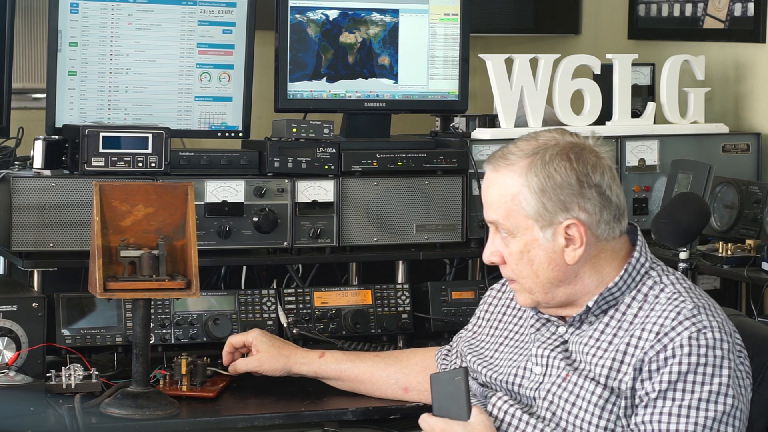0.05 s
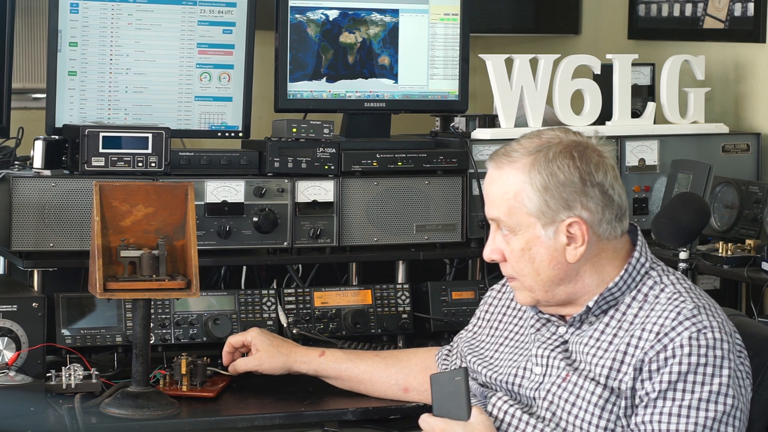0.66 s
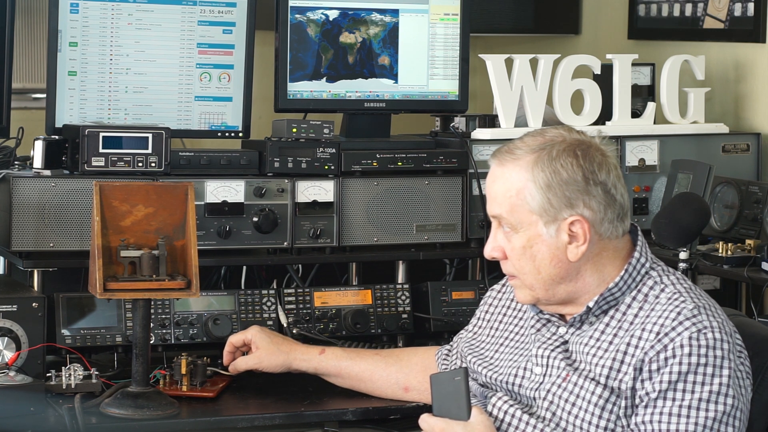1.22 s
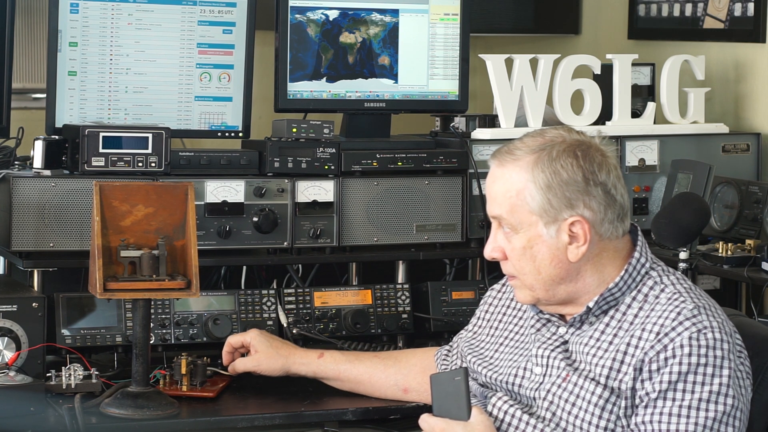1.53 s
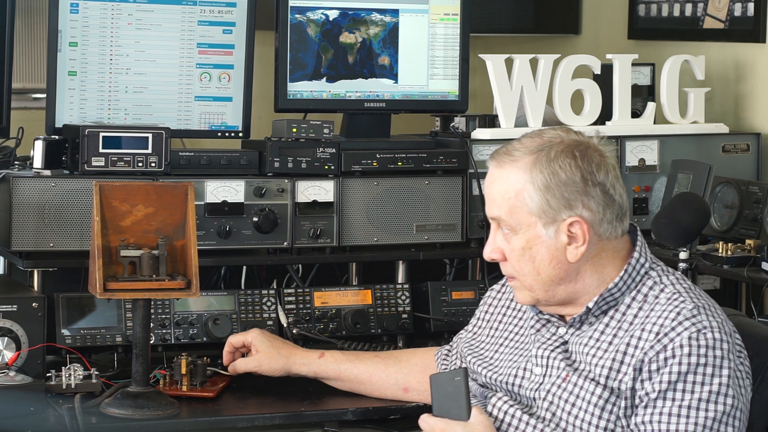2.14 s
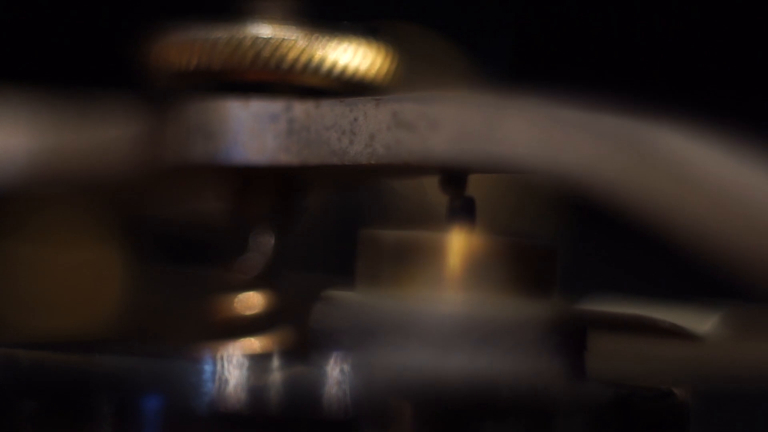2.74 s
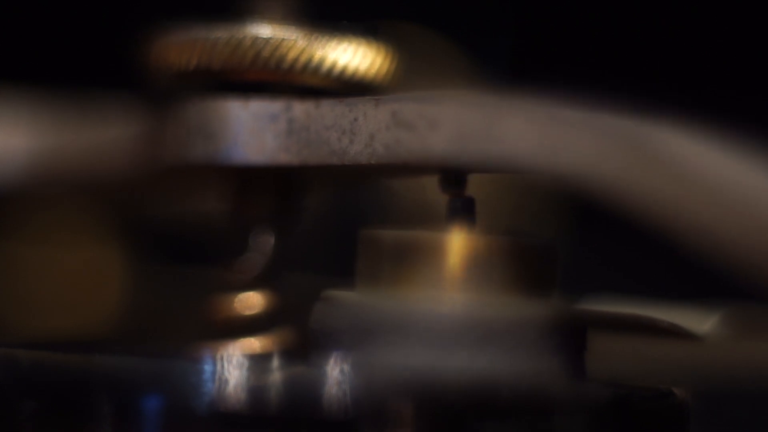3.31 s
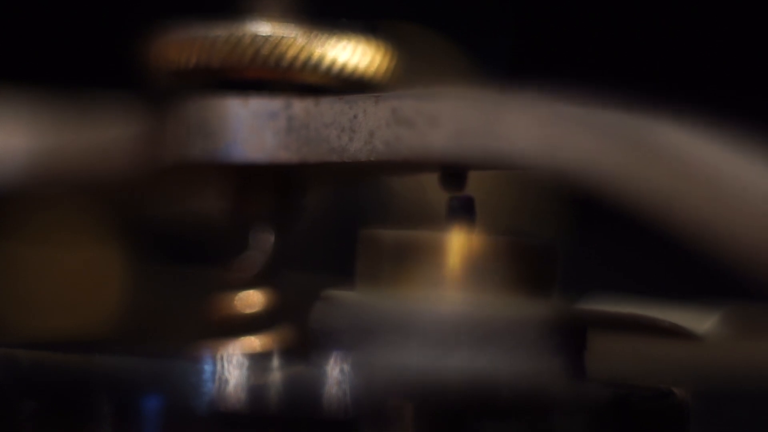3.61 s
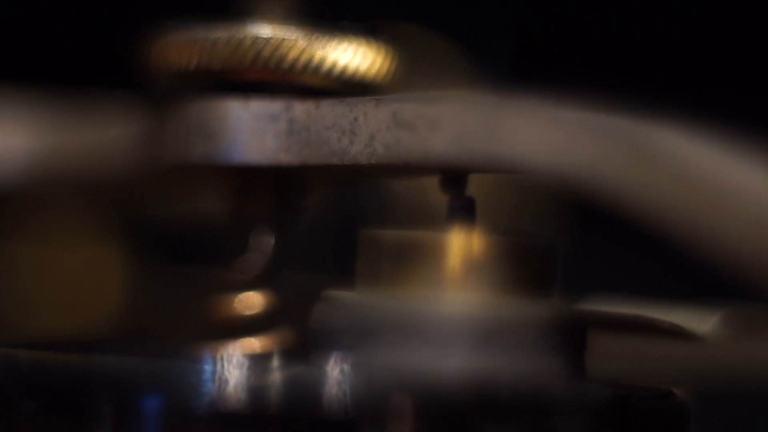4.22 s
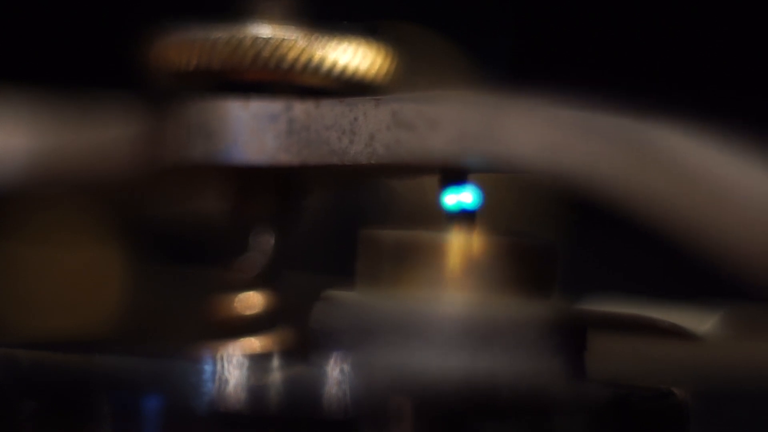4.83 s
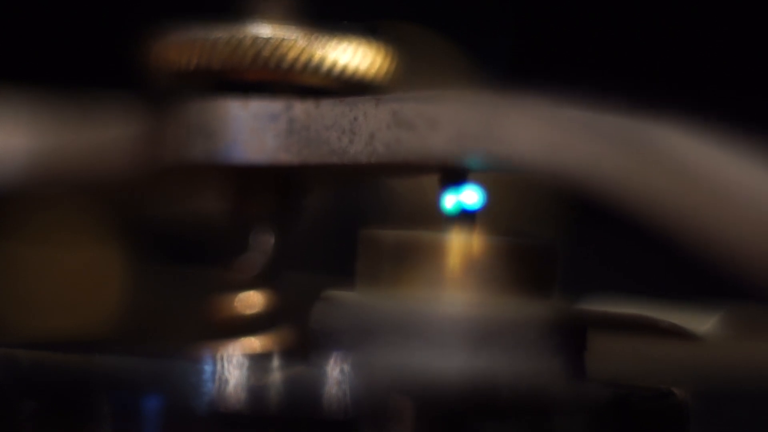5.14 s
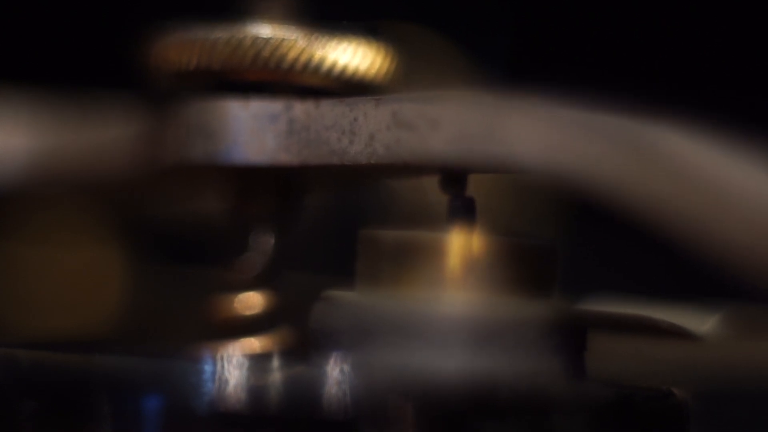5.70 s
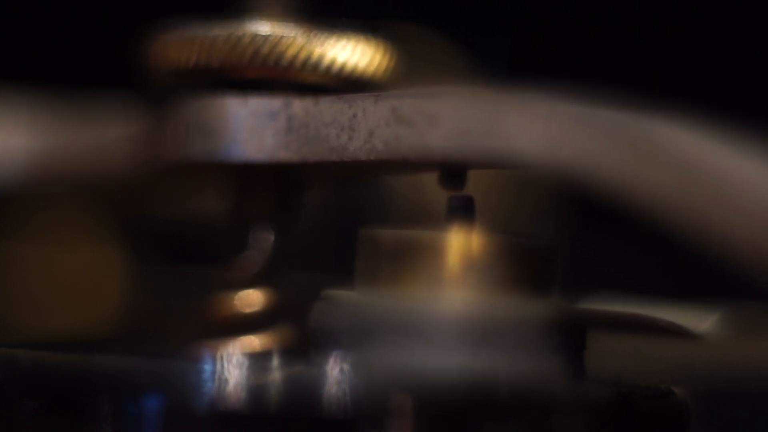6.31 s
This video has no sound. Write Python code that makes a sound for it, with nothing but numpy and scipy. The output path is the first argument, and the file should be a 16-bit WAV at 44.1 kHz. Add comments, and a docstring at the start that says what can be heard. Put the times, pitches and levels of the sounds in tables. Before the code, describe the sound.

A telegraph sounder in a wooden box taps out dots and dashes from the very start until about 6.3 seconds. Each mark is a pair of sounds: a hard, bright metallic click as the lever lands, then a softer, duller clack as it springs back. Both have a brief metal ring and a slightly hollow, small-room tail. The hand key ticks faintly just ahead of each blow.

The rhythm is uneven, about four pairs a second, with dots as tight double clicks and dashes spread about a fifth of a second apart. Long and short pairs mix until around 3 seconds, followed by quick dots to 3.8, three dashes to 4.7, more dots to 5.7, then one dash and two closing dots. A quiet, steady bed of low transformer hum and cooling fans continues underneath throughout.

```python
"""Telegraph sounder in a radio room

A sounder in a wooden resonator box follows a hand key in a small room full of radio gear.
On each dot or dash the magnet pulls the lever onto the anvil with a bright click; the spring
throws it back on the upper stop with a duller clack. The key ticks faintly ahead of each blow.
Underneath lies a steady bed of transformer hum and cooling fans."""
import sys
import numpy as np
from scipy.fft import rfft, irfft, next_fast_len
from scipy.io import wavfile
from scipy.ndimage import map_coordinates

SR = 44100
rng = np.random.default_rng(int(sys.argv[2]) if len(sys.argv) > 2 else 0)


def wav_record(signal):
    """Record a signal, one row per channel, as 16-bit PCM in the file named by sys.argv[1]."""
    frames = np.transpose(np.atleast_2d(signal))
    bounded = np.clip(frames, -1, 1)
    # unit amplitude maps onto the largest positive 16-bit level
    quanta = np.round(bounded * 32767).astype(np.int16)
    wavfile.write(sys.argv[1], SR, quanta)


N = 289384
HIT_SAMPLES = SR // 4
T = np.arange(HIT_SAMPLES) / SR  # time within one hit

# colour of the fans' rush: f/Hz, relative level/dB
FAN_RUSH = [(25, -27), (50, -21), (75, -11.5), (100, -18), (130, -8), (155, -13.5), (240, -2), (330, -3),
            (680, -4), (1000, -8.5), (2400, -14), (5000, -18.5), (10000, -19.5), (11500, -30), (13800, -34)]
# steady tones of transformers and fans: f/Hz, rms level/dB, waver depth
HUM_TONES = [(57.5, -67, .2), (119, -65.5, .4), (172, -47, 0.076), (239.6, -48.5, 0.21), (255.7, -52, 0.36),
             (286, -52, 0.42), (366, -54, 0.62)]
# cabinet resonances: f/Hz, half-width/Hz, rms level/dB
CABINET_MODES = [(232, 16, -55), (304, 12, -55.5), (376, 18, -51.5), (470, 22, -53.5), (619, 33, -49),
                 (800, 33, -50.3)]
# dots and dashes, timed by hand: lever lands t/s, lever lifts t/s
MORSE_MARKS = [(-.23, -.035), (.045, .256), (.536, .742), (.859, .907), (.995, 1.174), (1.274, 1.316),
               (1.525, 1.657), (1.758, 1.966), (2.089, 2.135), (2.225, 2.411), (2.664, 2.836),
               (2.961, 3.001), (3.089, 3.131), (3.369, 3.416), (3.695, 3.753), (3.836, 4.044),
               (4.129, 4.349), (4.540, 4.738), (4.843, 4.909), (5.008, 5.071), (5.171, 5.232),
               (5.328, 5.375), (5.642, 5.707), (5.787, 6.031), (6.122, 6.178), (6.265, 6.311)]
# colour of a hard contact's snap, on key or lever: f/Hz, relative level/dB
CONTACT_SNAP = [(300, -30), (1000, -17), (2000, -10), (3300, -0.5), (5000, -1.5), (6200, -1.5), (9000, -1),
                (11000, -8), (13800, -9)]
# lever on the upper stop, heavily damped modes: f/Hz, relative level/dB, t60/s
STOP_IMPACT_MODES = [(1870, -27, 0.019), (2203, -21, 0.022), (2800, -15.5, 0.015), (3295, -17.5, 0.014),
                     (3780, -16, 0.013), (4300, -13, 0.0089), (4650, -18, .01), (5750, -19.5, 0.0087),
                     (6720, -21, 0.0085), (7370, -13.5, .01), (8660, -10, 0.012), (9120, -14, 0.0093),
                     (9970, -13.5, 0.011), (12040, -16, 0.012), (13040, -16.5, .012)]
# lever on the upper stop, ringing modes: f/Hz, relative level/dB, t60/s
STOP_RING_MODES = [(799, -39.5, 0.22), (1319, -43, 0.22), (1466, -38.5, 0.18), (1958, -33, 0.19),
                   (2085, -34.5, 0.19), (2155, -38, 0.22), (2285, -31, 0.17), (2420, -35, 0.19),
                   (2557, -28, 0.22), (2831, -32.5, 0.26), (2940, -38.5, 0.23), (3440, -32, 0.17),
                   (3550, -32, 0.15), (4188, -42, 0.17), (4260, -33, 0.17), (4400, -30.5, 0.18),
                   (4540, -40, 0.17), (7498, -36, 0.21), (7800, -39, 0.17), (8478, -36.3, 0.15),
                   (8602, -36, 0.17), (12700, -39, 0.17)]
# wash of frame, box and room after a blow on the stop: f/Hz, relative level/dB
STOP_WASH_COLOUR = [(300, -25), (800, -12.5), (1050, -15.5), (1400, -4.5), (1700, -12), (2100, 1.5),
                    (2600, 5.5), (3200, -4.5), (4500, -2), (6300, -9.5), (7700, -2.5), (10000, -4),
                    (11300, -11.5), (13000, -8.5), (13900, -17)]
# lever on the anvil, heavily damped modes: f/Hz, relative level/dB, t60/s
ANVIL_IMPACT_MODES = [(2690, -17, .014), (3123, -13, 0.019), (3393, -2, 0.016), (3880, -5.5, 0.0095),
                      (4140, -5, 0.01), (4597, 1, 0.0083), (4850, -7.5, .007), (5570, -11, 0.0089),
                      (6800, -11.5, 0.0073), (7435, -5, 0.008), (8520, -3.5, 0.0089), (9017, 0, 0.011),
                      (9650, -4.5, 0.011), (10240, -1, 0.0095), (11070, -11, 0.01), (12080, -14, 0.011),
                      (13120, -20, .008)]
# lever on the anvil, ringing modes: f/Hz, relative level/dB, t60/s
ANVIL_RING_MODES = [(801.7, -32, 0.15), (1421, -32.5, 0.16), (1487, -31, .12), (2140, -37, 0.18),
                    (2270, -33, 0.17), (2554, -31.5, 0.19), (2680, -32, 0.17), (2956, -24, 0.2),
                    (3094, -33, 0.16), (3280, -30.5, 0.22), (3336, -26.5, 0.21), (3422, -22, 0.21),
                    (3550, -40, 0.13), (4165, -29, 0.17), (4381, -21.5, 0.17), (4480, -43, 0.13),
                    (4570, -29, .17), (4683, -36, 0.19), (4825, -29.5, 0.23), (8712, -27.5, .18),
                    (8870, -32, 0.19), (8998, -26.5, 0.21), (9110, -28, 0.19), (9230, -26.5, 0.16),
                    (9550, -34, .17), (9628, -34, .17), (9700, -21, .18), (9900, -24, 0.16),
                    (10135, -33, 0.15), (10400, -26, .16)]
# wash of frame, box and room after a blow on the anvil: f/Hz, relative level/dB
ANVIL_WASH_COLOUR = [(300, -34), (800, -14.5), (1100, -22.5), (1450, -12), (1750, -19), (2500, -5),
                     (3200, 1), (3800, -3), (4600, 1.5), (5400, -8.5), (6300, -10), (8000, -6.5),
                     (9100, -1), (10400, -2), (11400, -10.5), (13800, -20)]


def amp(db):
    """Decibels to gain."""
    return 10 ** (np.asarray(db) / 20)


def unit(x):
    """Scale to rms 1."""
    return x / np.sqrt(np.mean(x ** 2) + 1e-20)


def filtered(x, response):
    """EQ a sound; response gives the gain at each frequency."""
    size = next_fast_len(len(x) + 8192)
    gains = response(np.fft.rfftfreq(size, 1 / SR))
    return irfft(rfft(x, size) * gains, size)[:len(x)]


def noise(colour, size):
    """Noise of rms 1, shaped by an EQ curve drawn on a log frequency axis."""
    hz, db = np.transpose(colour)
    white = rng.standard_normal(size)
    return unit(filtered(white, lambda f: amp(np.interp(np.log(f + 1), np.log(hz + 1), db))))


def wobble(rate):
    """A smooth random curve, rate knots a second."""
    return map_coordinates(rng.standard_normal(200), [np.arange(N) * rate / SR], mode="wrap")


def add(track, at_s, sound):
    """Drop a sound onto the track, trimming what overhangs either end."""
    start = round(at_s * SR)
    part = sound[max(-start, 0):max(len(track) - start, 0)]
    track[max(start, 0):][:len(part)] += part


def swell(rise_s):
    """A smooth attack."""
    return 1 - np.exp(-(T / rise_s) ** 2)


def decay(db, t60):
    """An envelope that starts at db and falls 60 dB in t60 seconds."""
    return amp(db - 60 * T / t60)


def struck_modes(modes, rise_s, scatter_db, count):
    """Damped sines, one row a hit; each mode comes out a little stronger or weaker every time."""
    hz, db, t60 = np.transpose(modes)[:, :, None]
    phases = rng.uniform(0, 2 * np.pi, hz.shape)
    waves = swell(rise_s) * decay(db, t60) * np.sin(2 * np.pi * hz * T + phases)
    gains = amp(scatter_db * rng.standard_normal((count, len(waves))))
    return gains @ waves


def dense_modes(colour, fresh, count):
    """Countless weak modes as noise, one row a hit; fresh is the share of power new to each hit."""
    rows = noise(colour, HIT_SAMPLES * (count + 1)).reshape(-1, HIT_SAMPLES)
    return np.sqrt(1 - fresh) * rows[0] + np.sqrt(fresh) * rows[1:]


def radio_gear():
    """The bed: rushing fans, wavering hum and cabinet resonances stirred by the fans."""
    t = np.arange(N) / SR
    bed = amp(-41) * noise(FAN_RUSH, N)
    for hz, db, depth in HUM_TONES:
        waver = 1 + depth * (wobble(7) + 1j * wobble(6.3))  # level and phase both drift
        bed += amp(db) * unit(np.real(waver * np.exp(2j * np.pi * hz * t)))
    for hz, half_width, db in CABINET_MODES:
        drone = filtered(rng.standard_normal(N), lambda f: 1 / (1 + ((f - hz) / half_width) ** 2))
        bed += amp(db) * unit(drone)
    return bed


def hand_key(pull_in_s=0.02, drop_out_s=0.0076):
    """The contacts tick just ahead of the sounder: the magnet needs time to pull in and to let go."""
    count = len(MORSE_MARKS)
    tap_envelope = decay(db=-31, t60=0.12) * swell(0.00096)
    break_envelope = decay(db=-22, t60=0.004) + decay(db=-38, t60=0.12)
    taps = tap_envelope * dense_modes(CONTACT_SNAP, fresh=0.35, count=count)
    breaks = break_envelope * dense_modes(CONTACT_SNAP, fresh=0.31, count=count)
    track = np.zeros(N)
    for (lands, lifts), tap, snap in zip(MORSE_MARKS, taps, breaks):
        add(track, lands - pull_in_s, tap)
        add(track, lifts - drop_out_s, snap)
    return track


def lever_blows(times, *, impact, impact_db, impact_rise_s, crack_db, crack_t60, ring, ring_db,
                ring_rise_s, wash, wash_db, wash_rise_s, wash_t60, fresh, echoes):
    """Same spot, same force, so the blows are nearly alike: click, echoes, wash and metal ring."""
    count = len(times)
    cracks = decay(crack_db, crack_t60) * swell(impact_rise_s) * dense_modes(CONTACT_SNAP, fresh, count)
    impacts = amp(impact_db) * struck_modes(impact, impact_rise_s, scatter_db=1.4, count=count)
    # box and room fill up over a few milliseconds, then die away
    washes = decay(wash_db, wash_t60) * swell(wash_rise_s) * dense_modes(wash, fresh, count)
    rings = amp(ring_db) * struck_modes(ring, ring_rise_s, scatter_db=1.6, count=count)
    track = np.zeros(N)
    for at_s, click, tail in zip(times, cracks + impacts, washes + rings):
        add(track, at_s, click + tail)
        for delay_s, db in echoes:  # near surfaces double the attack and turn it hollow
            add(track, at_s + delay_s, amp(db) * click)
    return track


def stop_clacks():
    """The spring throws the lever back on the upper stop: softer and duller, with a strong echo."""
    return lever_blows(
        [lifts for _, lifts in MORSE_MARKS],
        impact=STOP_IMPACT_MODES, impact_db=-1.5, impact_rise_s=0.00076,
        crack_db=-16, crack_t60=0.025,
        ring=STOP_RING_MODES, ring_db=2, ring_rise_s=0.0048,
        wash=STOP_WASH_COLOUR, wash_db=-17.5, wash_rise_s=0.0039, wash_t60=0.2,
        fresh=0.22, echoes=[(0.0072, -2.5), (0.0145, -9.5)])


def anvil_clicks():
    """The magnet slams the lever onto the anvil: a hard, bright click opens each dot or dash."""
    return lever_blows(
        [lands for lands, _ in MORSE_MARKS],
        impact=ANVIL_IMPACT_MODES, impact_db=-0.74, impact_rise_s=0.00071,
        crack_db=-10.5, crack_t60=0.018,
        ring=ANVIL_RING_MODES, ring_db=0.94, ring_rise_s=0.005,
        wash=ANVIL_WASH_COLOUR, wash_db=-13.5, wash_rise_s=0.0061, wash_t60=0.21,
        fresh=0.17, echoes=[(0.007, -5.5), (0.0152, -14)])


def scene():
    """Key and sounder over the bed of radio gear, in mono."""
    return (hand_key() + anvil_clicks() + stop_clacks() + radio_gear())[None]


def record(dry):
    """Clip any peaks at full scale, then cut the treble above 14 kHz."""
    clipped = np.clip(dry[0], -1, 1)
    return filtered(clipped, lambda hz: hz < 14000)[None]


dry = scene()
out = record(dry)
wav_record(out)
```